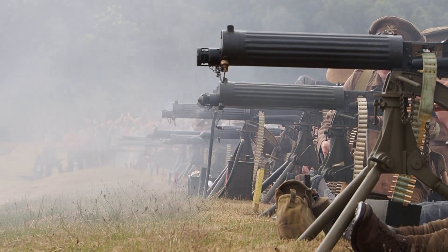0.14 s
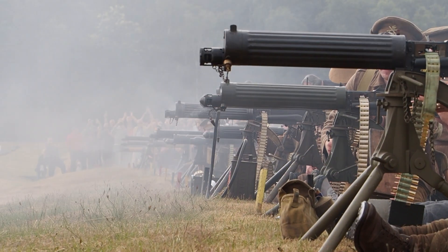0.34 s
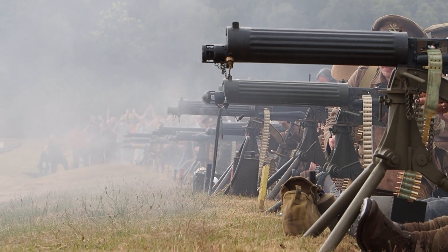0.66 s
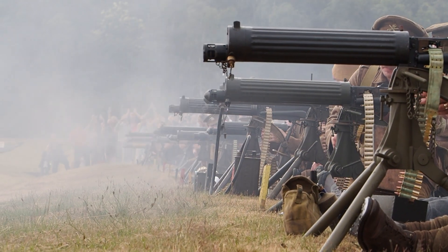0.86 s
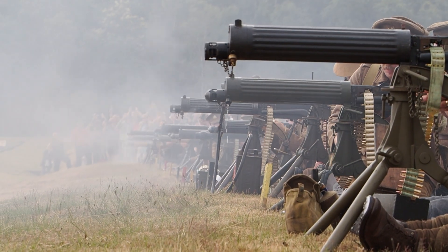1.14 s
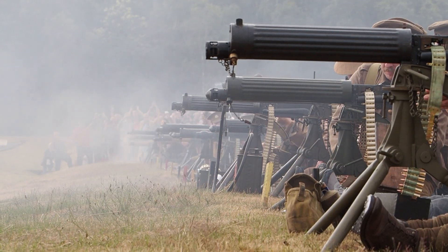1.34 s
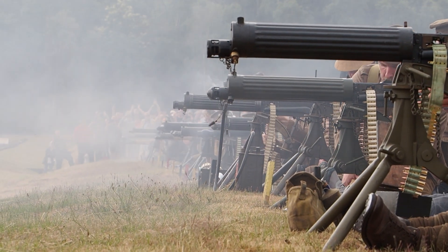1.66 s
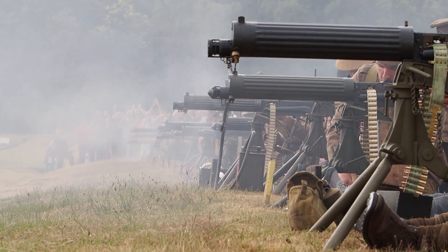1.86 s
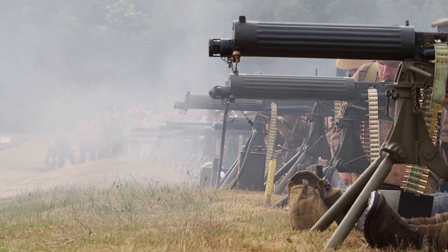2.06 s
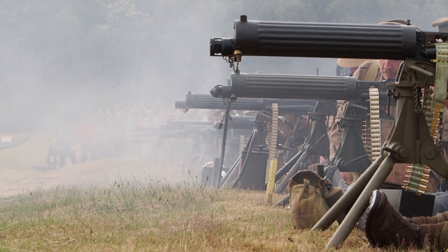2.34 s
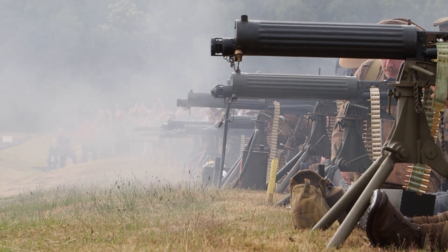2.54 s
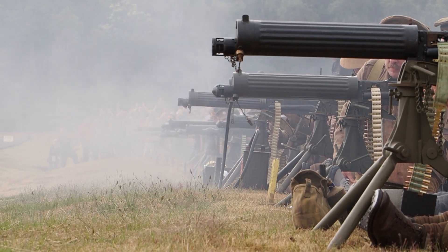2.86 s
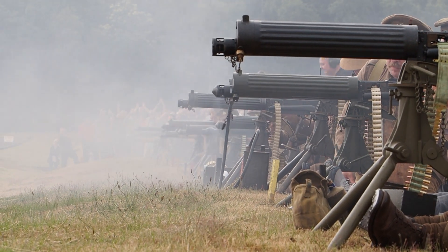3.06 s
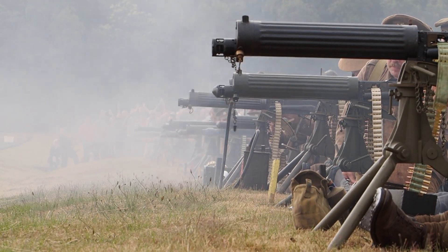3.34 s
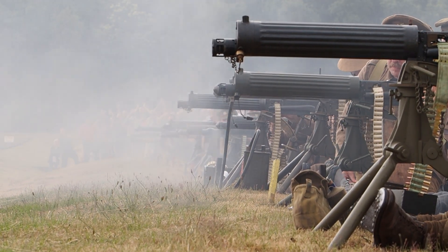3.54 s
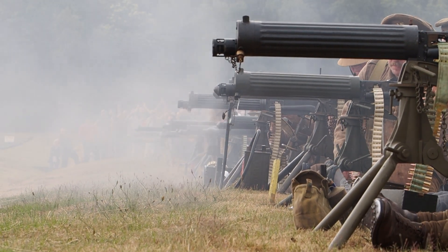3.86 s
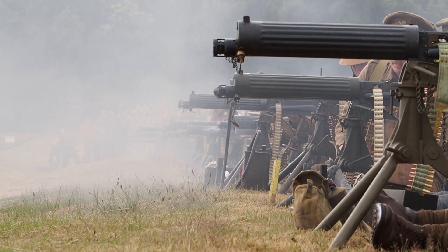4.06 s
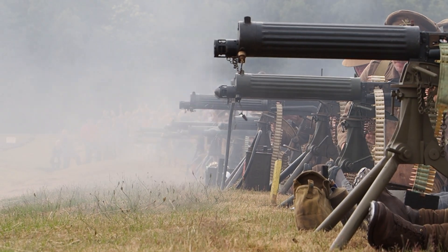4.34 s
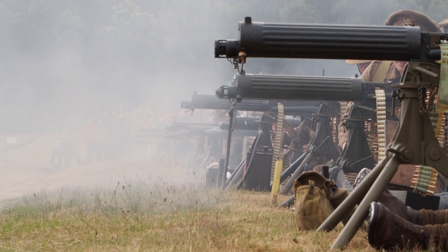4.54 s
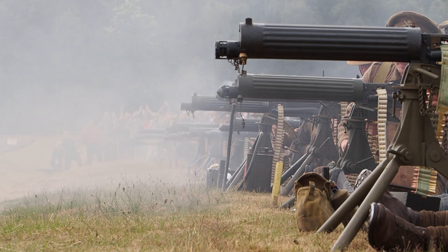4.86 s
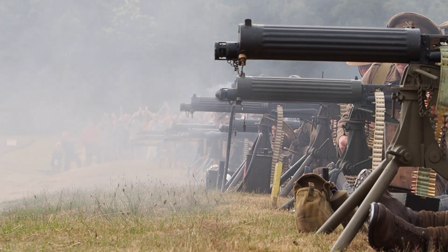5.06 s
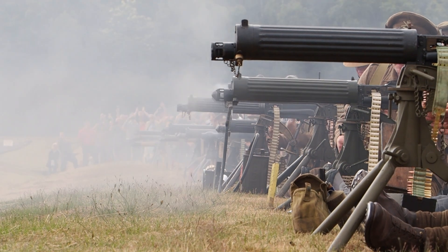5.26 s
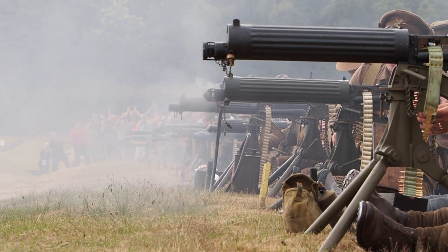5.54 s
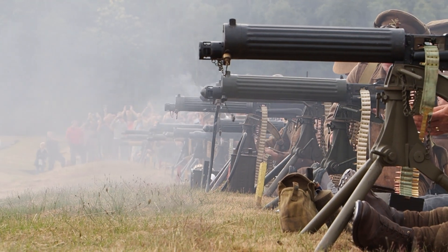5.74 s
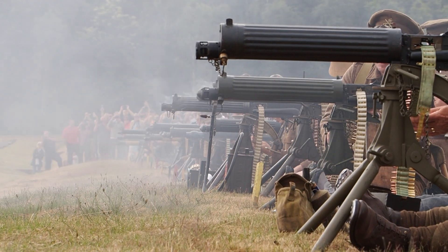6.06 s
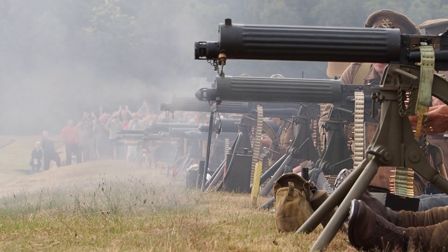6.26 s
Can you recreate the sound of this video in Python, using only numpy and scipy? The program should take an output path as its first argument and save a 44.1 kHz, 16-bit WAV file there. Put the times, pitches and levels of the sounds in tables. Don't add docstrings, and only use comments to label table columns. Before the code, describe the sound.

A row of heavy machine guns hammers overlapping rapid bursts on an open grass range, sharp cracks with short rolling echoes from mounds and trees.

```python
import sys
import numpy as np
from scipy import signal
from scipy.io import wavfile
from scipy.ndimage import uniform_filter1d, minimum_filter1d

SR = 44100
rng = np.random.default_rng(int(sys.argv[2]) if len(sys.argv) > 2 else 0)


def magnitude_from_level(level_db):
    exponent = np.asarray(level_db, float) / 20
    return 10 ** exponent


def store_pcm(level_fs):
    pcm = np.round(np.clip(level_fs, -1, 1) * 32767).astype(np.int16)
    wavfile.write(sys.argv[1], SR, np.atleast_2d(pcm).T)


N = 282673

# (delay [ms], share left [-], share right [-]); the early one is the bullet's crack
MIDDLE_BOUNCE = [(-.35, .06, 0.06), (0.452, 0.0094, 0.019), (0.952, 0.074, 0.12)]
# (delay [ms], share left [-], share right [-])
FAR_BOUNCE = [(-.35, 0.083, 0.074), (.25, 0.23, 0.069), (.55, 0.1, 0.083), (.92, 0.34, 0.035)]

# (shock gain [dB], scatter gain [dB], share of blast thrown back by the ground, sharpness of the front,
#        jacket ring gain [dB], top of the scatter [Hz], share of scatter that is sharp pushes)
MIDDLE_SHAPE = (1.1, 17, 6, 1.55, 29, -6, -14)
FAR_SHAPE = (1.78, 16, 7.5, 2, 25.5, -2.5, -12)
FAR_PATH = (0.1, 12.6, 0.51, 1.06, 3.2, 13300, 0.3)


def band(x, lo_hz, hi_hz):
    return signal.sosfilt(signal.butter(2, [lo_hz, min(hi_hz, .45 * SR)], "band", fs=SR, output="sos"), x)


def pair(size, like):
    mid, side = rng.standard_normal((2, size))
    like = np.clip(like, 0, 1)
    return np.sqrt((1 + like) / 2) * mid + np.sqrt((1 - like) / 2) * side * np.array([[1], [-1]])


def fade(ms, decay):
    return (ms > 0) * np.exp(-np.maximum(ms, 0) / decay)


def lumps(size, step):
    steps = np.repeat(rng.standard_normal(size // step + 1), step)
    return uniform_filter1d(steps, step)[:size]


def earlier_fire(t):
    return band(pair(N, 0.8), 40, 1400) * magnitude_from_level(-17.5 - 60 * t / 0.08)


def distant_roar(t):
    # (time [s], level [dB])
    roar_weight = [(0.0, -38.5), (0.66, -41.5), (0.86, -48), (1.18, -41), (1.48, -41), (1.78, -46.5),
                   (2.09, -52), (2.6, -51), (3.5, -52), (4.12, -54), (4.68, -42.5), (4.84, -75),
                   (4.96, -41), (5.16, -47.5), (5.73, -44), (6.14, -54), (6.41, -43)]
    roar_db = np.interp(t, *np.transpose(roar_weight))
    roar = magnitude_from_level(roar_db) * band(pair(N, 0.19), 740, 2630)
    rumble_db = -21.5 - 2 * t
    rumble = magnitude_from_level(rumble_db) * band(pair(N, 1.0), 41, 170)
    hiss_db = -63 + 0.29 * (roar_db + 54)
    hiss = magnitude_from_level(hiss_db) * band(pair(N, 0.22), 290, 10700)
    return roar + rumble + hiss


def spike(ms, edge):
    pulse = np.exp(-.5 * (ms / 0.028) ** 2)
    front = np.exp(-.5 * ((ms + 0.025) / 0.0069) ** 2)
    return pulse + edge * front


def shock_bounces(ms, bounces, bounce_db, edge):
    delay, *share = np.transpose(bounces)
    chance = rng.standard_normal((2, 2, len(delay)))
    late = delay + .02 * chance[0]
    size = np.array(share) * magnitude_from_level(1.5 * chance[1]) * magnitude_from_level(bounce_db)
    copies = size[..., None] * spike(ms - late[..., None], edge)
    return np.sum(copies, axis=1)


def scattered_grit(own, pushes):
    own_share = 0.59
    grit = np.sqrt(1 - own_share) * pair(2048, 0.48) + np.sqrt(own_share) * own
    grit = grit * np.abs(grit) ** .5
    sharp = np.maximum(grit, 0) ** 1.57 - 0.5
    return (1 - pushes) * grit + pushes * sharp


def jacket_ring(ms, gain_db):
    ring_hz = 1039 * (np.array([[.96], [1.04]]) + .03 * rng.standard_normal((2, 1)))
    tones = np.sin(2 * np.pi * ring_hz * ms / 1000).sum(0)
    level = magnitude_from_level(-43 + gain_db + 1.5 * rng.standard_normal())
    return level * tones * fade(ms, 11.5)


def blast(ms, zero, second, decay):
    ms = np.maximum(ms, 0)
    stretch = min(np.log(2) / np.log(second / zero), 1)
    wave = np.sin(np.pi * (ms / zero) ** stretch) * np.exp(-ms / decay)
    wave = wave * (1 - np.exp(-ms / 0.24))
    return wave / np.abs(wave[ms > zero]).max()


def guns(shots, bounces, shape, place, path):
    zero, second, decay, scatter_ms, bank_ms, bank_db, crew_db = shape
    side_db, field_db, per_shock, per_scatter = place
    shock_gain_db, scatter_gain_db, thrown, edge, jacket_db, top_hz, pushes = path
    own = pair(2048, 0.85)
    direct, sent = np.zeros((2, N + 2048)), np.zeros(N)
    left_late_ms = np.array([[.006], [0]])
    for s, shock_db, blast_db, scatter_db, *bounce_db in shots:
        start = int(s * SR) - 64
        ms = 1000 * ((start + np.arange(2048)) / SR - s)
        copies = shock_bounces(ms[:256], bounces, sum(bounce_db), edge)
        pan_db = side_db + 1.2 * rng.standard_normal()
        ports = magnitude_from_level(np.array([[pan_db], [-pan_db]]) / 2)
        shock = ports * spike(ms[:256] - left_late_ms, edge) + copies
        shock = np.pad(shock, ((0, 0), (0, 2048 - 256)))
        grit = scattered_grit(own, pushes)
        dull = band(signal.lfilter([.3], [1, -.75], grit), 300, top_hz)
        spray = ports ** 0.77 * dull * fade(ms - .3, scatter_ms)
        crew = magnitude_from_level(crew_db) * band(grit, 7200, 7800) * fade(ms - 4.5, 3.5)
        bank_after = ms - bank_ms - np.array([[0], [.2]])
        bank = magnitude_from_level(bank_db) * band(dull, 600, 6200) * fade(bank_after, 0.56)
        ring = jacket_ring(ms, jacket_db)
        boom = ports ** 0.19 * blast(ms, zero, second, decay)
        boom = boom + thrown * np.exp(-.5 * ((ms - 6.4) / 1.7) ** 2)
        sound = magnitude_from_level(shock_db + shock_gain_db) * shock
        sound = sound + magnitude_from_level(blast_db) * (boom + bank)
        sound = sound + magnitude_from_level(scatter_db + scatter_gain_db) * (spray + crew)
        sound = sound + magnitude_from_level(0.44 * shock_db) * ring
        direct[:, start:start + 2048] += sound
        sent[int(s * SR)] += magnitude_from_level(field_db + per_shock * shock_db + per_scatter * scatter_db) ** 2
    return direct[:, :N], sent


def far_guns():
    # (time [s], shock [dB], blast [dB], scattered shocks [dB])
    far_shots = [(0.0051, -21, -21.5, -31.5), (0.1613, -14, -18, -26), (0.3114, -21, -20, -27),
                 (0.4527, -16, -22, -33), (0.6032, -15, -21, -31), (0.7604, -17.5, -27.5, -38.5),
                 (0.889, -30, -11, -15), (0.9041, -15, -22, -30), (0.9474, -24, -29, -40),
                 (1.0579, -18, -25, -35), (1.3486, -10.5, -21, -18.5), (1.3505, -1, -24, -20),
                 (1.492, -0.5, -21.5, -23.5), (1.6406, 1, -23, -22.5), (4.2762, -4, -21, -32),
                 (4.3412, -28, -29.5, -45), (4.4638, -19, -25.5, -33.5), (4.588, -5.5, -16, -24),
                 (4.7015, 1, -19, -31), (4.823, -23, -26, -33), (4.9443, -13.5, -20, -23),
                 (5.0681, -19, -33, -43), (5.188, -19, -24.5, -32), (5.428, -1.5, -14.5, -20),
                 (5.5827, -8, -19, -22)]
    early = [shot for shot in far_shots if shot[0] < 3]
    late = [shot for shot in far_shots if shot[0] > 3]
    early_shape = (1.8, 11, 6.5, 2, 29, -20, -11.5)
    place = (-2.5, -28.5, -0.14, 0.64)
    early_direct, early_sent = guns(early, FAR_BOUNCE, early_shape, place, FAR_PATH)
    late_direct, late_sent = guns(late, FAR_BOUNCE, FAR_SHAPE, place, FAR_PATH)
    return early_direct + late_direct, early_sent + late_sent


def farthest_guns():
    # (time [s], shock [dB], blast [dB], scattered shocks [dB])
    farthest_shots = [(0.0884, -45, -34, -38.5), (0.212, -28, -34, -39), (0.5283, -24, -33, -34),
                      (0.6672, -21, -35, -39), (0.8052, -31, -34, -38), (0.834, -37, -38, -33),
                      (0.9723, -27, -30.5, -31.5), (1.022, -17, -29, -25), (1.1249, -38, -38, -37.5),
                      (1.141, -21, -32.5, -36), (1.2655, -24, -30.5, -40), (1.3309, -26, -32.5, -37.5),
                      (1.5831, -40, -42, -44), (1.7597, -29.5, -38, -44), (3.2936, -39, -44, -57),
                      (3.9792, -12.5, -26.5, -23.5), (0.9176, -26, -31, -31), (1.3915, -26, -44, -42),
                      (1.4103, -31, -39, -44), (1.4575, -34, -34.5, -43), (1.4852, -32, -43, -44),
                      (2.6275, -47, -44, -60), (5.1745, -31, -42, -42), (5.1794, -34, -44, -42),
                      (4.4912, -35, -48, -52), (6.3854, -23.5, -37, -45)]
    # (delay [ms], share left [-], share right [-])
    farthest_bounce = [(.25, 0.38, 0.059), (.55, 0.09, 0.25), (.95, 0.78, 1)]
    shape = (4.5, 10.5, 5, 2, 36, -5, -33)
    place = (0, -22, -0.24, 1.1)
    path = (-3.5, 9.5, -0.4, 1.9, 7, 9000, 0.3)
    return guns(farthest_shots, farthest_bounce, shape, place, path)


def nearest_gun():
    # (time [s], shock [dB], blast [dB], scattered shocks [dB])
    nearest_shots = [(0.124, 6.5, -18.5, -9), (0.2757, 6, -19, -10.5), (0.4155, 4, -19, -11.5),
                     (0.5573, 6.5, -20, -12.5), (0.6987, 2.5, -25, -19), (5.3048, 1.5, -26.5, -14.5),
                     (5.4454, -2.5, -21, -18.5), (5.5914, 0.5, -18.5, -13), (5.731, 3, -18, -12.5),
                     (5.883, 4.5, -22, -15.5), (6.025, 4.5, -20, -12.5), (6.169, 6.5, -19.5, -15),
                     (6.3093, 4, -23, -14.5)]
    # (delay [ms], share left [-], share right [-])
    nearest_bounce = [(0.197, -2.63, -3), (0.383, 0.27, -0.4), (0.552, -0.85, 0.8), (0.739, -0.24, 0.2),
                      (.88, 0.71, -0.2), (1.052, 0.61, -0.26), (1.328, -0.02, 1.5), (1.752, -0.77, -0.35)]
    shape = (1.19, 5.5, 5, 2.5, 40.5, -2, -42)
    place = (-4, -21.5, 0.06, 0.65)
    path = (-0.5, 10.5, 1.35, -0.35, 6, 8000, -0.28)
    return guns(nearest_shots, nearest_bounce, shape, place, path)


def standout_shots():
    # (time [s], shock [dB], blast [dB], scattered shocks [dB])
    loud_shots = [
        (0.8424, 14.5, -24, -13),
        (1.0401, 8, -18.5, -22),
        (1.1971, 6.5, -36, -18),
        (3.8504, 4, -34, -21),
        (4.5779, 14.5, -39, -13.5),
        (4.8754, 9, -22.5, -16.5),
    ]
    place = (-1.5, -26.5, 0.51, 0.95)
    path = (1, 9.5, 1.1, 0.1, -2, 14002, 0.27)
    return guns(loud_shots, MIDDLE_BOUNCE, MIDDLE_SHAPE, place, path)


def slow_gun():
    # (time [s], shock [dB], blast [dB], scattered shocks [dB])
    slow_shots = [(1.5093, -5, -34, -11.5), (1.6543, -5.5, -52, -39), (1.8105, -15.5, -41, -10.5),
                  (1.9766, -3.5, -41, -47), (2.1331, -16, -31, -30), (2.2782, -23, -28, -19),
                  (2.4273, -17.5, -26.5, -19.5), (2.5754, -7.5, -50, -44), (2.7287, -19, -24, -19),
                  (2.8799, -20, -28, -17.5), (3.0452, -22, -33, -9), (3.1921, -7, -60, -37),
                  (3.3535, -25, -30, -18), (3.5022, -18, -25, -12.5), (3.652, -14.5, -23.5, -17)]
    place = (6, -37.5, 0.5, 0.23)
    path = (2.6, 5, 0.13, 3.2, 5.2, 14000, 0.48)
    return guns(slow_shots, MIDDLE_BOUNCE, MIDDLE_SHAPE, place, path)


def quick_gun():
    # (time [s], shock [dB], blast [dB], scattered shocks [dB])
    quick_shots = [(1.5558, -10, -22.5, -15.5), (1.6786, -10.5, -48, -19.5), (1.8007, -1.5, -39, -24.5),
                   (1.9224, -15, -33, -24.5), (2.0465, -16, -31, -23), (2.1665, -16, -32, -24.5),
                   (2.5334, -21, -31, -21), (2.7774, -15, -29, -21.5), (2.9008, -21, -30, -23.5),
                   (3.0214, -19.5, -32, -23.5), (3.1431, -21, -28.5, -21.5), (3.3836, -16.5, -35, -26),
                   (3.4413, -17.5, -29.5, -20), (3.5606, -16.5, -28, -21), (3.6813, -4, -30, -17),
                   (3.8022, -11.5, -26, -18), (3.9198, -29, -23, -20), (4.0398, -16, -29, -22),
                   (4.1597, -11.5, -32, -24), (4.2815, -5.5, -38, -16)]
    shape = (0.85, 15.5, 11, 1.15, 27, 1, -16)
    place = (-0.5, -38, -0.36, 0.93)
    path = (3.6, 8.1, 0.17, 1.2, 2.1, 15600, 0.64)
    return guns(quick_shots, MIDDLE_BOUNCE, shape, place, path)


def second_gun():
    # (time [s], shock [dB], blast [dB], scattered shocks [dB], bounces [dB])
    second_shots = [(1.8626, -6, -36, -17, 2), (1.9813, -4, -48, -18, -0.5), (2.1015, 0, -42, -20, 1),
                    (2.2237, -1, -40, -20, 0), (2.345, 2, -40, -13, 0.5), (2.4664, -4, -44, -17.5, 3.5),
                    (2.5924, -7, -45, -9, -4), (2.7142, -3.5, -45, -11.5, 0.5),
                    (2.8334, -1.5, -40, -18, -1), (2.9558, 1, -42, -22, -1), (3.0765, -5, -30, -10.5, 2),
                    (3.1998, -6, -39, -9.5, 5.5), (3.3217, 0, -44, -7, -1.5)]
    # (delay [ms], share left [-], share right [-])
    second_bounce = [(-.35, 0.19, 0.31), (0.448, -0.15, 0.53), (0.932, 0.39, 0.54), (1.031, 0.18, 0.5),
                     (1.45, -0.075, -0.51), (1.896, -0.044, 0.067)]
    shape = (1.5, 3.5, 11, 1.08, 17, -30, -18)
    place = (1.5, -50.5, 0.1, 0.1)
    path = (0.081, 7.4, 0.15, 1.29, 2.5, 35000, 0.91)
    return guns(second_shots, second_bounce, shape, place, path)


def far_guns_under():
    # (time [s], shock [dB], blast [dB], scattered shocks [dB])
    under_shots = [(1.9571, -16, -35, -44), (2.2563, -43, -39, -44), (2.2892, -22, -32, -37),
                   (2.4061, -30, -32, -53), (2.411, -17, -41, -50), (2.5491, -64, -33, -39),
                   (2.6557, -18, -39, -33.5), (2.6972, -18, -32, -43), (2.8433, -18, -32, -55),
                   (2.9858, -27, -34, -56), (3.2663, -16.5, -34, -37.5), (3.6213, -29, -32, -38),
                   (3.7387, -28, -32, -39.5), (3.8222, -18, -23.5, -27), (3.8565, -16, -27.5, -66),
                   (4.1016, -25, -26.5, -33.5), (4.1248, -17, -19, -24.5), (4.2206, -26, -28, -40)]
    place = (-1.5, -31, 0.4, 0.3)
    return guns(under_shots, FAR_BOUNCE, FAR_SHAPE, place, FAR_PATH)


def third_gun():
    # (time [s], shock [dB], blast [dB], scattered shocks [dB], bounces [dB])
    third_shots = [
        (3.4024, -5, -46, -15.5, 0.5),
        (3.5514, -5.5, -37, -13.5, -6),
        (3.7003, -2, -43, -14.5, -3.5),
        (3.9986, -3.5, -23, -10.5, 3.5),
        (4.1437, 3, -29, -21, -2.5),
        (4.2905, -9, -27, -10.5, -3),
        (4.432, -3.5, -31, -10.5, 1),
        (4.7263, -3, -34, -10, 0.5),
        (5.0224, 3, -36, -18, -1.5),
        (5.1618, 1.5, -36, -11, -3.5),
    ]
    # (delay [ms], share left [-], share right [-])
    third_bounce = [(-.35, 0.25, 0.25), (0.45, 0.066, 1), (0.7, 0.0011, 0.24), (0.948, 0.5, 0.62),
                    (1.118, 0.4, 0.5), (1.45, -0.21, -0.21), (1.9, 0.23, 0.092)]
    shape = (1.5, 6, 4, 1.12, 25, -17, -30)
    place = (4.5, -44.5, 0.7, 0.3)
    path = (0.1, 7.2, 0.65, 1.03, 1.2, 12500, 0.65)
    return guns(third_shots, third_bounce, shape, place, path)


def field(sent, bands, mound_column, mound_db):
    # (delay [ms], share for nearest gun [-], share for the others [-])
    mound_table = np.array([(9, 0.18, 0.28), (13.34, 0.75, 0.81), (17, 0.49, 0.095), (19.2, 0.37, 0.89),
                            (26.72, 0.91, 0.46), (30.6, 0.31, 0.43), (36.36, 0.15, 0.35),
                            (38.5, 0.23, 0.36), (43.66, 0.11, 0.25), (48.16, 0.25, 0.34), (53.6, .15, 0.16),
                            (59.44, 0.33, 0.13), (67, 0.17, 0.23), (82.15, 0.072, 0.15)])
    mounds = mound_table[:, mound_column]
    t, out = np.arange(SR) / SR, 0
    grainy = 2 * lumps(N, 110)
    shared = lumps(SR, 150)
    reach = SR // 4
    same = 0.68
    gap = (1000 * t - mound_table[:, :1]) / 1.24
    bump = np.exp(-.5 * gap ** 2)
    clumps = mounds @ bump
    thump = -magnitude_from_level(mound_db) * (mounds @ ((1 - 0.58 * gap ** 2) * bump))[:reach]
    mound_lag_ms = .55
    fixed = np.array([thump, np.roll(thump, int(mound_lag_ms * SR / 1000))])
    for lo_hz, hi_hz, onset, near, near_db, far, far_db, like in bands:
        rise = 1 - np.exp(-(1000 * t / onset) ** 3)
        close_db = near_db - 60 * t / near + 1.24 * shared + 1.8 * lumps(SR, 150)
        close = rise * magnitude_from_level(close_db) * (0.81 + 1.3 * clumps)
        grain = band(pair(reach, like), lo_hz, hi_hz)
        fixed = fixed + np.sqrt(same) * close[:reach] * grain / np.std(grain)
        murmur = rise * magnitude_from_level(far_db - 60 * t / far)
        loose = (1 - same) * close ** 2 + murmur ** 2
        power = np.maximum(signal.fftconvolve(sent, loose)[:N], 0)
        wash = band(pair(N, like), lo_hz, hi_hz)
        swell = magnitude_from_level(grainy + 1.5 * lumps(N, 110))
        out = out + np.sqrt(power) * swell * wash / np.std(wash)
    return out + signal.oaconvolve(np.sqrt(sent)[None], fixed, axes=1)[:, :N]


def field_answers(near_sent, down_sent):
    # (low edge [Hz], high edge [Hz], onset [ms], near time to fall 60 dB [s],
    # near level [dB], far time to fall 60 dB [s], far level [dB], left-right likeness [0-1])
    near_bands = [(25.3, 260, 14.6, 0.16, 0, 0.21, -15, 1), (132, 171, 5.8, 0.069, -15, 0.7, -9.5, 1),
                  (258, 610, 9, 0.13, -5.5, 0.8, -31, 0.7), (500, 1360, 16.4, 0.1, 7, 2, -28, 0.84),
                  (1060, 1500, 12, 0.12, 5, 2.3, -25, 0.3), (1680, 5000, 16.7, 0.11, 3.5, 2, -25.5, 0),
                  (4500, 18000, 3, 0.14, -7, 3.1, -34, 0)]
    # (low edge [Hz], high edge [Hz], onset [ms], near time to fall 60 dB [s],
    # near level [dB], far time to fall 60 dB [s], far level [dB], left-right likeness [0-1])
    down_bands = [(24.4, 250, 13, 0.14, 8.5, 0.28, -5, 1), (128, 300, 11, 0.17, -1.5, 0.53, -21, 1),
                  (282, 730, 4.7, 0.12, -4, 0.6, -28, 0.7), (545, 1660, 12, 0.14, 4, 0.92, -24, 0.81),
                  (1030, 1650, 5.7, 0.2, 0.5, 0.51, -20, 0.26),
                  (1710, 5000, 4.4, 0.24, -2, 0.34, -18, 0.057),
                  (4660, 10000, 4.1, 0.33, -11.5, 0.74, -33, 0.067),
                  (11500, 18000, 10, 0.3, -17, 0.9, -40, 0.093)]
    answer = field(near_sent, near_bands, mound_column=1, mound_db=7)
    answer = answer + field(down_sent, down_bands, mound_column=2, mound_db=12.5)
    return signal.sosfilt(signal.ellip(8, .3, 40, 15700, fs=SR, output="sos"), answer)


def scene():
    near, near_sent = nearest_gun()
    others = [second_gun(), third_gun(), slow_gun(), quick_gun(), standout_shots(),
              far_guns(), far_guns_under(), farthest_guns()]
    down, down_sent = (sum(part) for part in zip(*others))
    answer = field_answers(near_sent, down_sent)
    t = np.arange(N) / SR
    return near + down + answer + earlier_fire(t) + distant_roar(t)


def patchy_treble(x):
    hz, _, cells = signal.stft(x, SR, nperseg=256)
    wide, frames = 4, cells.shape[2]
    power = (np.abs(cells[:, 1:]) ** 2).sum(0)
    level = 10 * np.log10(power.reshape(-1, wide, frames).mean(1) + 1e-18)
    loudest_near = -minimum_filter1d(-level, size=15, axis=1)
    beside = level < loudest_near - 17.5
    dense = uniform_filter1d(beside.mean(0), size=120)
    luck = np.repeat(rng.random((len(level), frames // 2 + 1)), 2, axis=1)[:, :frames]
    silent = np.repeat(beside & (luck < .95 * dense), wide, axis=0)
    silent = silent & (hz[1:, None] > 4100)
    cells[:, 1:] *= ~silent
    return signal.istft(cells, SR, nperseg=256)[1][:, :N]


def roll_off(x):
    return signal.sosfilt(signal.butter(12, 16760, fs=SR, output="sos"), x)


def record(dry):
    # (frequency [Hz], width [Hz], share added [-], negative = dip)
    housing = [(175, 20, 0.18), (482, 180, -0.46), (1034, 61, 0.41), (1288, 25, -0.092), (1507, 180, -0.25),
               (2180, 220, 0.37), (2760, 950, 0.53), (6710, 1260, -0.26), (7290, 400, 0.93),
               (11350, 800, -0.4), (14900, 3700, 0.53)]
    x = -band(dry, 20.8, 14400)
    for hz, width_hz, share in housing:
        x = x + share * signal.lfilter(*signal.iirpeak(hz, hz / width_hz, fs=SR), x)
    x = x + np.array([[-.18], [.18]]) * band(x, 10, 110)
    x = np.array([np.roll(x[0], 1), x[1]])
    x = np.clip(magnitude_from_level([[-.5], [.5]]) * x, -1, 1)
    x = signal.sosfilt(signal.ellip(6, .3, 30, 16500, fs=SR, output="sos"), x)
    mix = patchy_treble(x)
    return roll_off(mix)


dry = scene()
out = record(dry)
store_pcm(out)
```